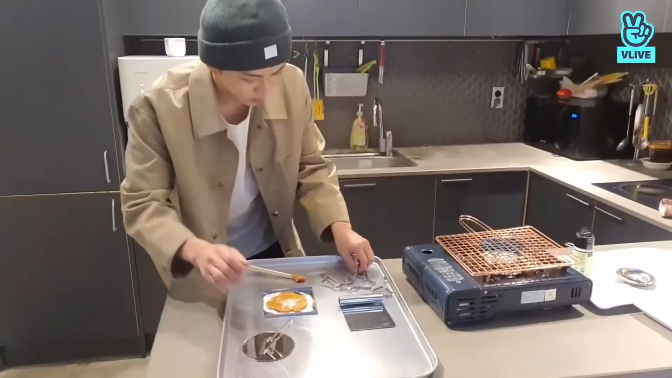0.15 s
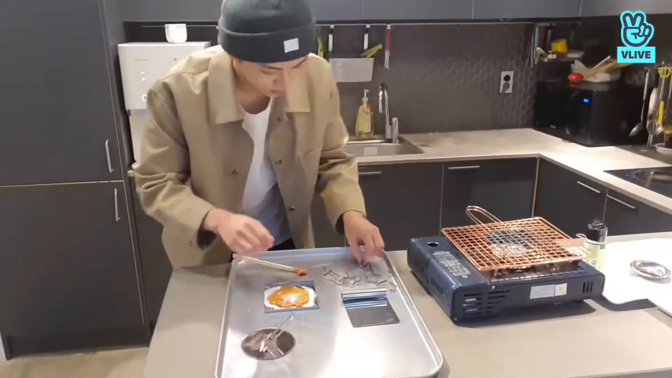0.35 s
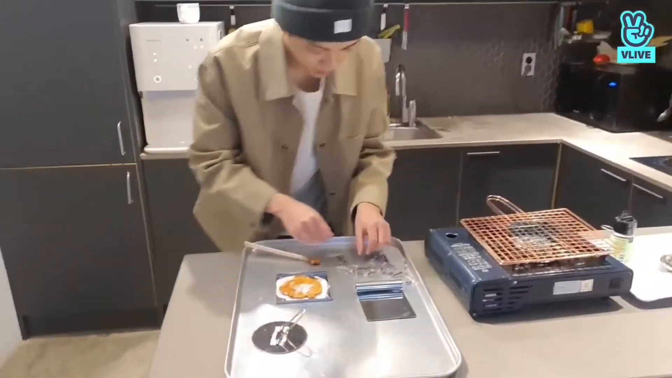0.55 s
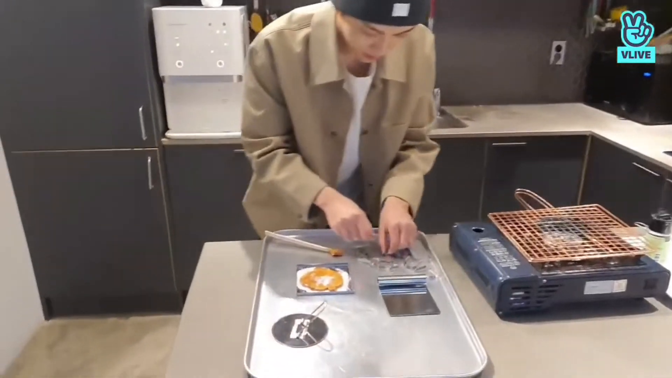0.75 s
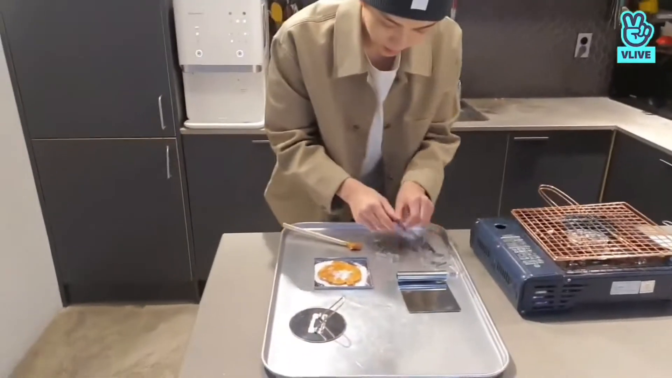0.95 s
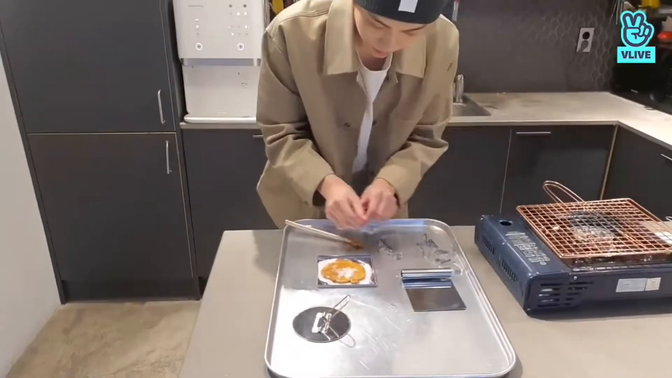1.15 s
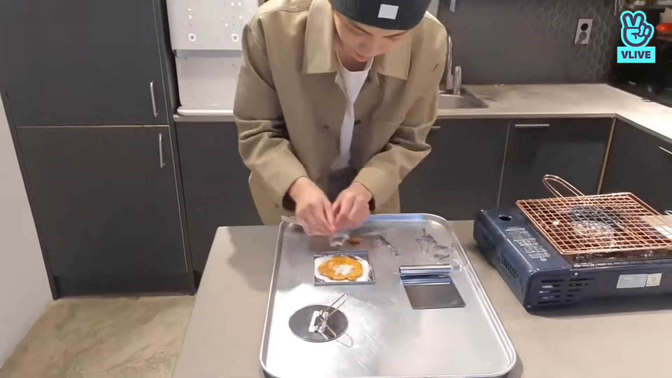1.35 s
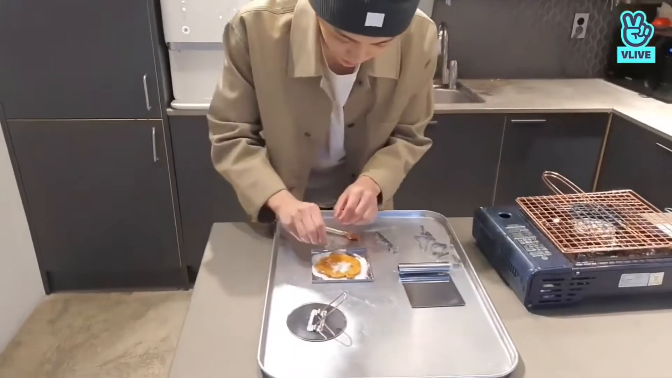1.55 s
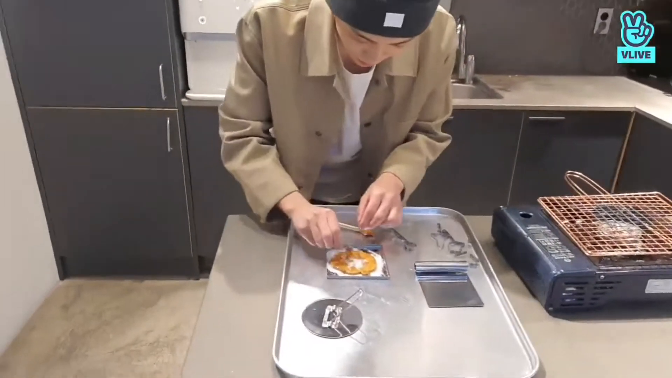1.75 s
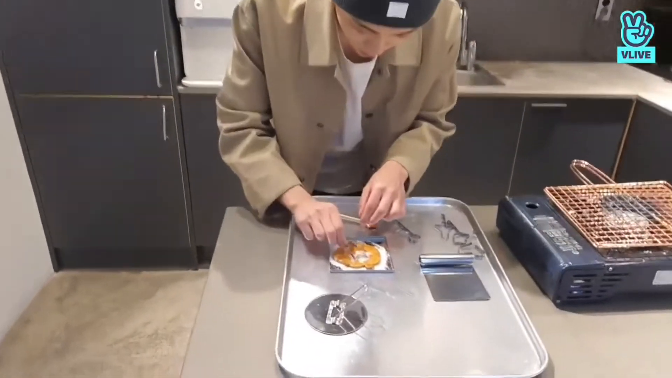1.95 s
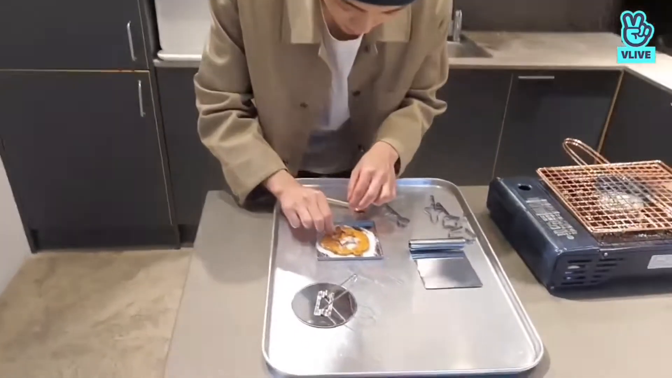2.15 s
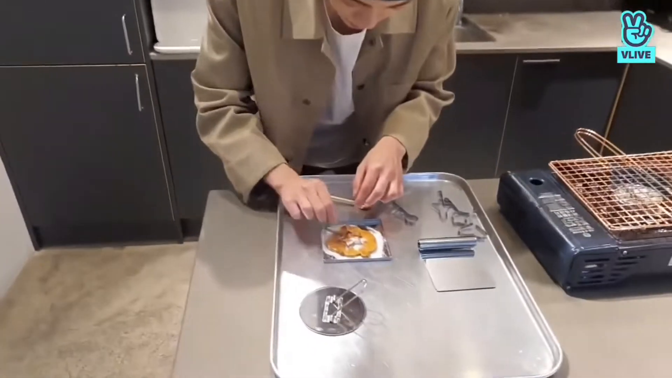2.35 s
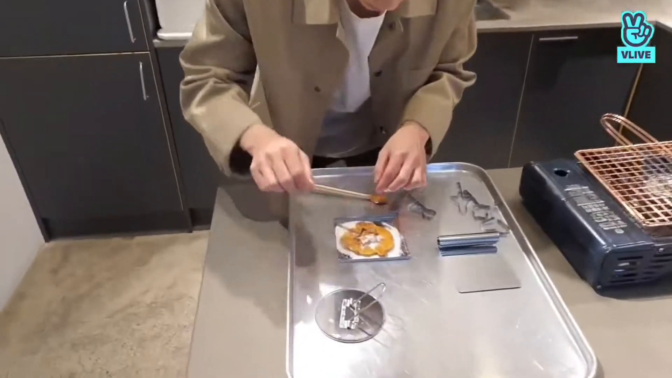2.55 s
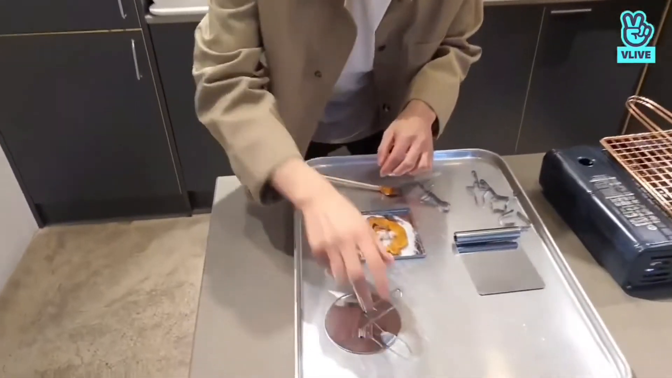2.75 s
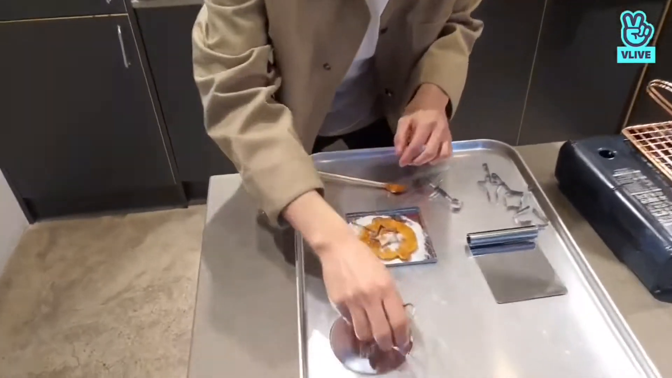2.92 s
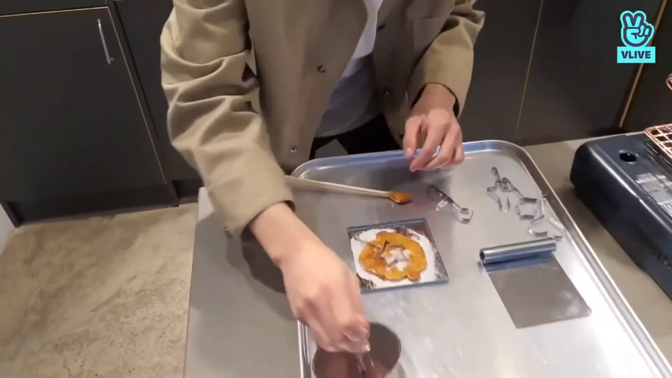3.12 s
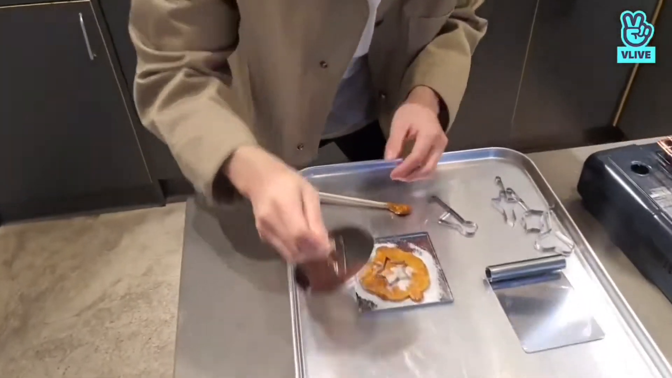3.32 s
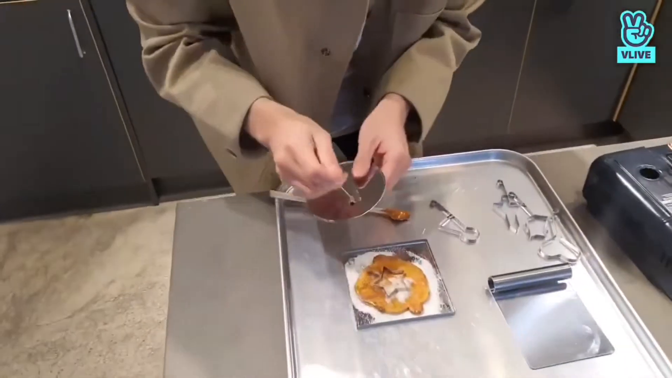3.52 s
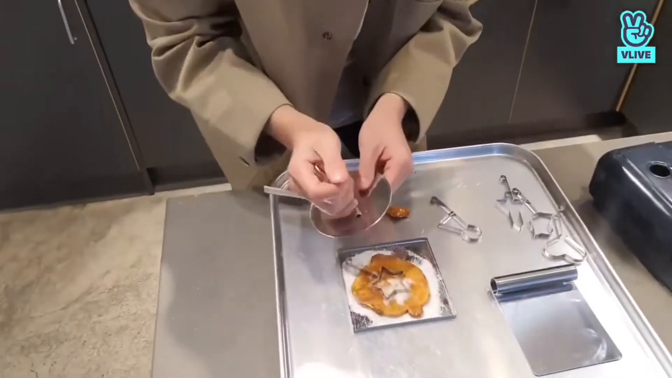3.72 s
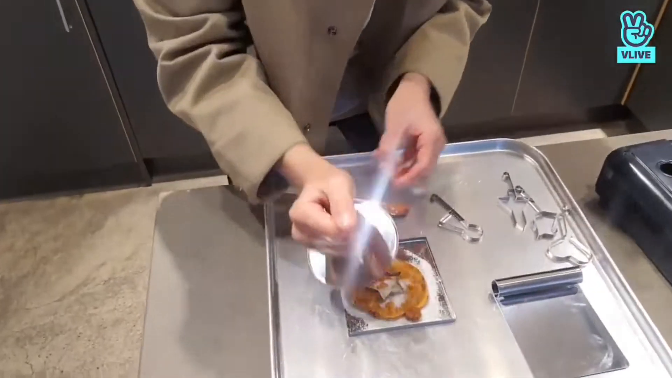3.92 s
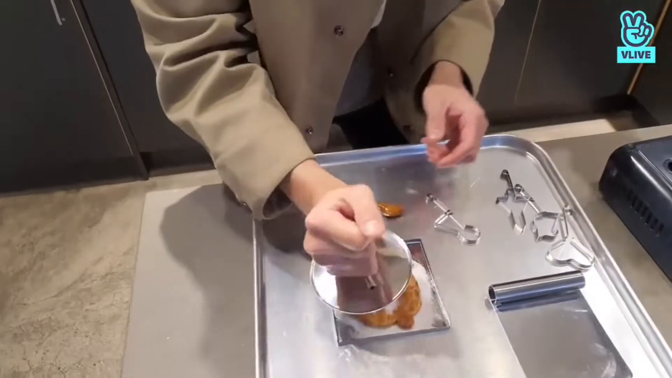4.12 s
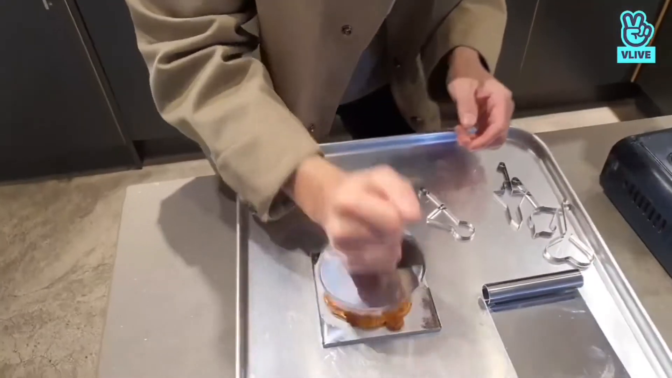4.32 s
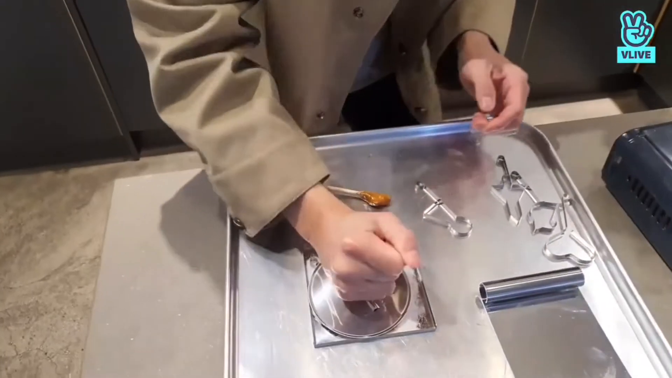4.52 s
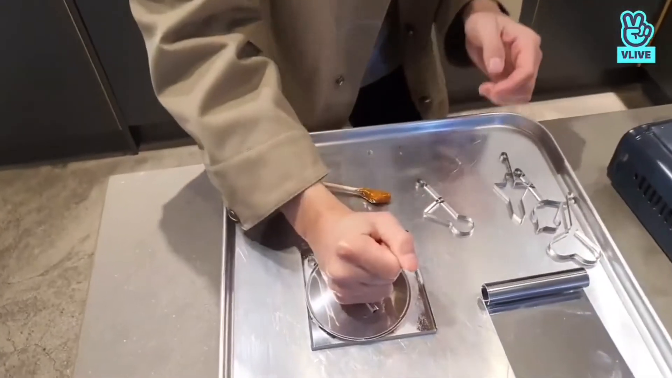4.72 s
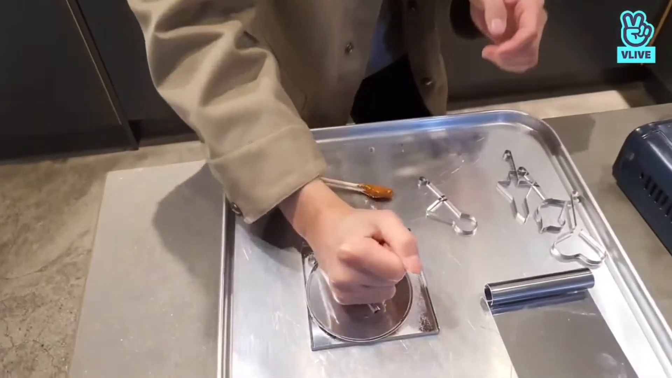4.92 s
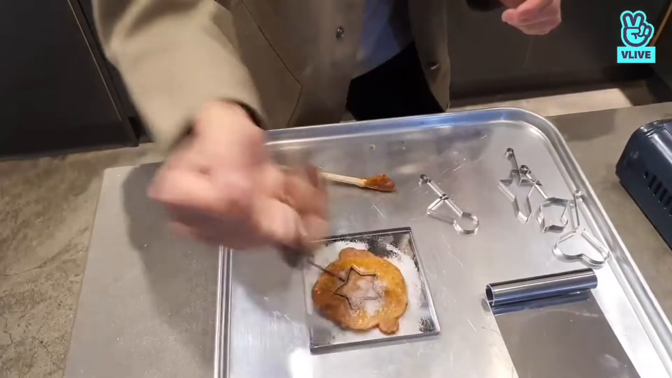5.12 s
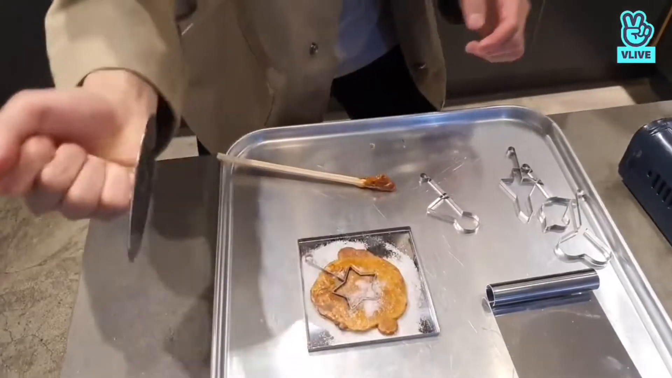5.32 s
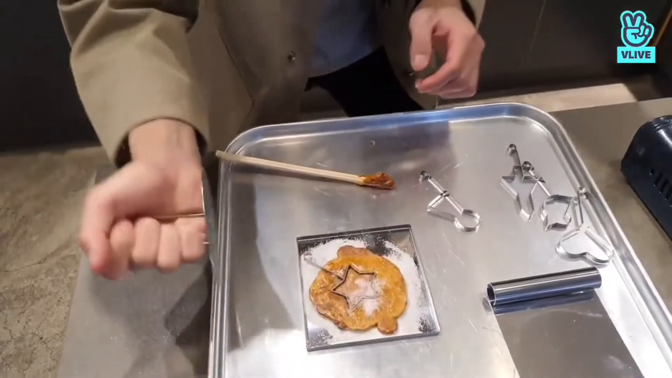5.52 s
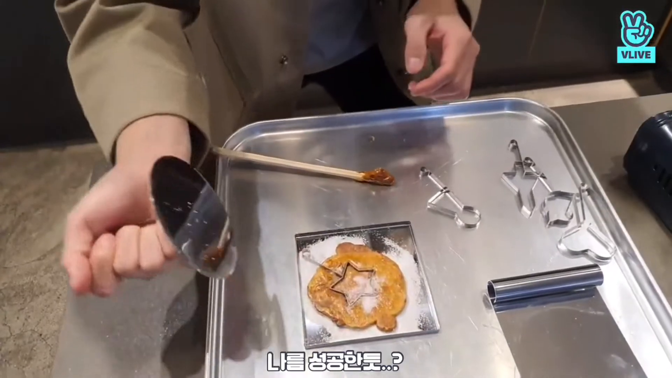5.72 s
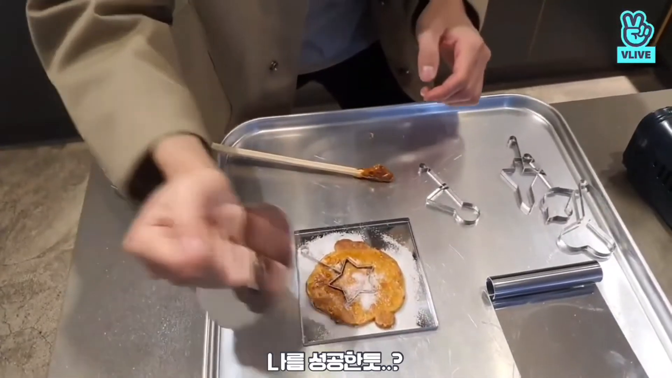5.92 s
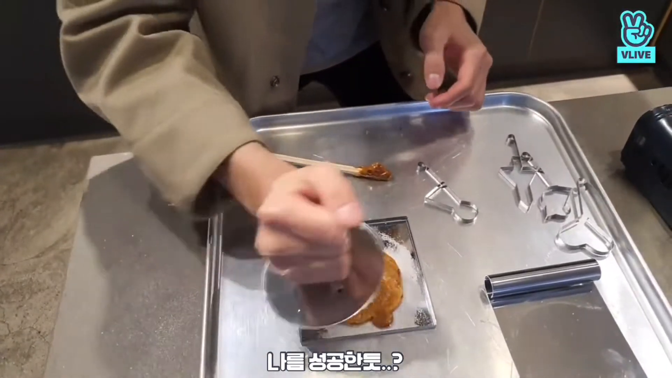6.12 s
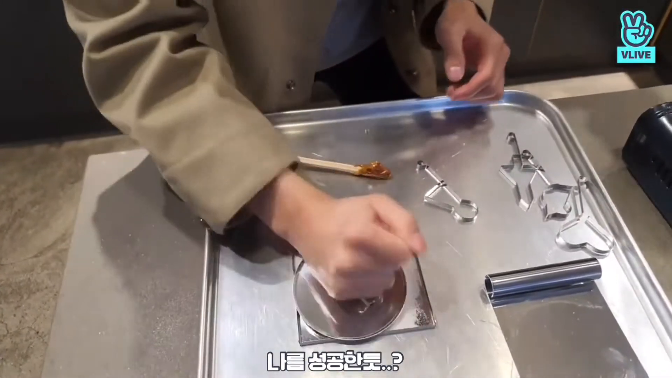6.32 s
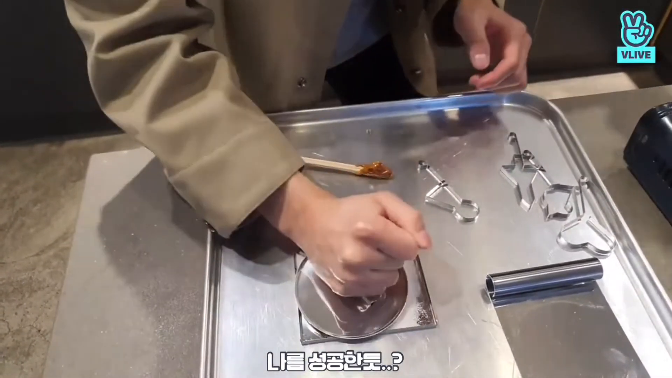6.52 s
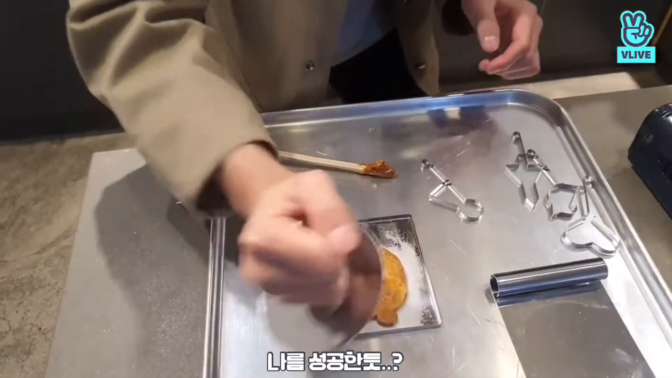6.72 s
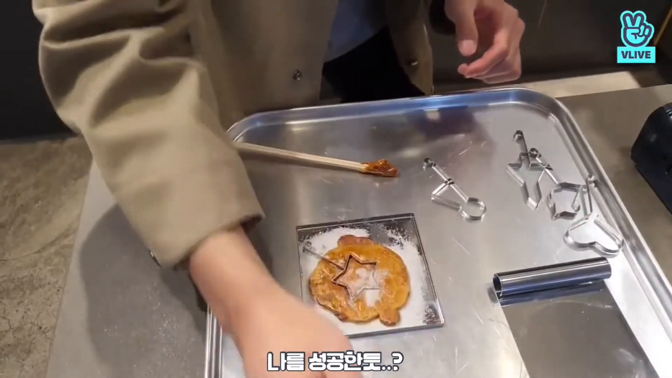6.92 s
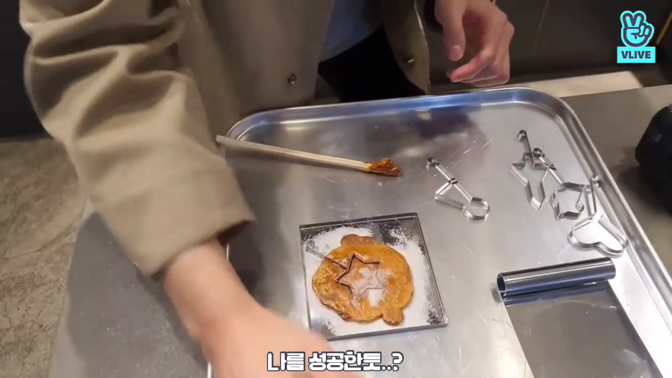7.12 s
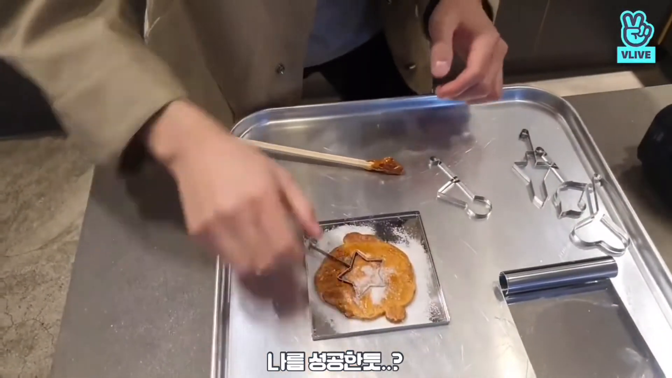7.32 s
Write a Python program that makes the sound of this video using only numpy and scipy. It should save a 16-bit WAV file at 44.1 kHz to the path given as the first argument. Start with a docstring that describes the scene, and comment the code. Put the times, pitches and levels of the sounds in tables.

```python
"""A steel press disc knocks, clinks and lifts on a sheet-steel tray as hands work in a hard-walled kitchen.
Each touch is a noise crack, tuned disc modes, a low tray boom and a dense shimmer dying band by band.
Thin cutters tinkle as high noise ticks with short modes; sleeves rustle as noise whose level and colour move.
Below lie a low appliance hum of banded noise, its level changing over time, and two faint narrow-noise whines."""
import sys
import numpy as np
from scipy import signal
from scipy.fft import rfft, irfft
from scipy.io import wavfile
from scipy.ndimage import uniform_filter1d

SR = 44100
rng = np.random.default_rng(int(sys.argv[2]) if len(sys.argv) > 2 else 0)


def generate_wav(sig):
    """Save sig (samples, or channels by samples) to the path in sys.argv[1] as 16-bit PCM at SR."""
    pcm = np.round(np.clip(np.atleast_2d(sig).T, -1, 1) * 32767).astype(np.int16)
    wavfile.write(sys.argv[1], SR, pcm)


N = 329338

CONTACT_RISE_S = 0.0015   # metal meets metal over a moment
FAVOUR_DB = 16   # favoured disc modes stand this far above the others
SHEEN_DB = -0.5   # trim of crack, shimmer and contact above 8 kHz


def from_db(db):
    """Turn a level in dB into a gain."""
    return 10 ** (np.asarray(db) / 20)


def rms_one(x):
    """Scale a signal to rms 1."""
    return x / np.sqrt(np.mean(x ** 2) + 1e-20)


def in_time(rows):
    """Read the columns of a time curve at every sample."""
    time_s, *columns = np.transpose(rows)
    return [np.interp(np.arange(N) / SR, time_s, column) for column in columns]


def at_hz(points, hz):
    """Read a spectrum on a log frequency axis."""
    points = np.array(points)
    return np.interp(np.log(hz), np.log(points[:, 0]), points[:, 1])


def drift(rate_hz):
    """Slow chance of rms 1: noise through two equal low-pass poles, drawn every 40 samples."""
    pole = np.exp(-2 * np.pi * rate_hz * 40 / SR)
    noise = rng.standard_normal(N // 40 + 2002)
    slow = signal.lfilter([1], [1, -2 * pole, pole * pole], noise)[2000:]   # skip the filter's start
    return np.interp(np.arange(N) / 40, np.arange(len(slow)), rms_one(slow))


def clicks(times_s, gains):
    """A train of single samples on a tiny offset."""
    train = np.full(N, 1e-18)
    np.add.at(train, (np.asarray(times_s) * SR).astype(int), gains)
    return train


def ring(train, hz, t60_s):
    """A two-pole resonator: a unit click sets a dying sine of height 1 ringing."""
    radius = from_db(-60 / (t60_s * SR))
    angle = 2 * np.pi * hz / SR
    return signal.lfilter([0, np.sin(angle)], [1, -2 * radius * np.cos(angle), radius * radius], train)


def fade(train, t60_s):
    """Each click becomes an exponentially dying envelope."""
    return signal.lfilter([1], [1, -from_db(-60 / (t60_s * SR))], train)


def bandpass(x, low_hz, high_hz):
    """Keep one band of a signal."""
    return signal.sosfilt(signal.butter(2, [low_hz, high_hz], "band", fs=SR, output="sos"), x)


def noise_bank(envelope_at, modal_db=0):
    """Noise in bands with their own envelopes; modal_db makes narrow lines, as a sheet's crowded modes."""
    mode_spacing_hz = 25
    edges_hz = 22 * 2 ** np.arange(0, 9.7, .3)
    spectrum = rfft(rng.standard_normal((2, N)))
    knots = rng.standard_normal(int(SR / 2 / mode_spacing_hz))
    lines = np.interp(np.linspace(0, len(knots) - 1, spectrum.shape[1]), np.arange(len(knots)), knots)
    white = rms_one(irfft(spectrum * from_db(modal_db * lines), N))
    out = np.zeros(N)
    for k, (low, high) in enumerate(zip(edges_hz, edges_hz[1:])):
        # neighbouring bands use unrelated noise
        out += bandpass(white[k % 2] * envelope_at(np.sqrt(low * high)), low, high)
    return out


def struck(times_s, level_db, modes, favour_db):
    """Every blow strikes each mode with a strength of its own, a moment sooner or later."""
    shape = (len(times_s), len(modes))
    spread_db = rng.normal(0, 2.0, shape)
    late_s = rng.random(shape) * 2 * CONTACT_RISE_S
    out = np.zeros(N)
    for k, (hz, mode_db, t60_s) in enumerate(modes):
        gains = from_db(level_db + mode_db + favour_db(hz) + spread_db[:, k])
        out += ring(clicks(times_s + late_s[:, k], gains), hz, t60_s)
    return out


def disc_touches():
    """Gather heavy landings, light touches and lifts; their grip and point struck differ."""
    # disc landing on tray or plate with its weight; levels are relative:
    # start_s, level_db, brightness_db_per_octave, low_weight_db, tray_boom_db, tray_shimmer_db,
    # favoured low_mode_hz, middle_mode_hz, high_mode_hz
    landings = [(0.445, -49, -3.5, 14.5, 9.5, 3, 1210, 3800, 4820),
                (0.505, -32.5, -2.6, 16.5, -8, 0, 1200, 3960, 4730),
                (2.909, -11, -3.5, -1.5, -28.5, -9.5, 1370, 3380, 6530),
                (2.958, -22, -1.1, 0, -21.5, -3, 1310, 4230, 4600),
                (4.408, 0.5, 0.56, 8, -31.5, -8, 1504, 3340, 7770),
                (6.354, -2, 1.3, 14.5, -17, -6.5, 1360, 3610, 4890),
                (6.513, -25.5, -6.5, -9, -13.5, -4, 1280, 3800, 5100),
                (6.627, -19, -0.7, 7.5, -40, -12.5, 1340, 2280, 7200),
                (7.011, 2, 0.1, -18.5, -37, -11.5, 1690, 4000, 6600),
                (7.023, 0, -4, -21.5, -33.5, -41, 2270, 3940, 7180),
                (7.035, 0, -1, 3, -32.5, -16, 1500, 3030, 6500),
                (7.138, -23, -0.8, 8, -17, -2.5, 1440, 3400, 4600),
                (7.315, -38.5, -2.5, 22, -10.5, -13, 1720, 3740, 4410)]
    # light touches of the disc's edge and wire handle:
    # start_s, level_db, brightness_db_per_octave, tray_shimmer_db,
    # favoured low_mode_hz, middle_mode_hz, high_mode_hz
    light_touches = [(0.259, -39, 0, 7, 1950, 3670, 5850), (0.819, -22.5, 0.1, -4, 2060, 3950, 5960),
                     (1.655, -49, 0, 1, 1350, 4170, 7000), (3.042, -25.5, 5, -23, 1620, 2490, 4430),
                     (3.08, -33, 4, -21, 1600, 2450, 5350), (3.108, -23, 8.5, -15, 1900, 2270, 5270),
                     (3.201, -23.5, -2, -13, 1740, 3156, 5800), (3.235, -27, -3.5, -8, 1730, 3260, 5260),
                     (3.43, -43.5, -9, -10, 1880, 3110, 5800), (3.56, -32.5, 6, -10.5, 1600, 4480, 7060),
                     (3.62, -18.5, 5.5, -8, 1630, 3120, 5040), (3.656, -20.5, -2, -8, 1660, 2750, 5100),
                     (3.739, -38, 1, -3, 1670, 2840, 4820), (3.818, -16, -0.2, -11, 1750, 3480, 7100),
                     (3.858, -25.5, -7.5, -13, 1490, 3320, 4740), (3.919, -38, 1, -1, 1540, 3200, 5800),
                     (3.996, -27.5, -7, -18, 1510, 2790, 6440), (4.071, -36, -1, -16, 1420, 2200, 5870),
                     (4.138, -36, -6.5, -11, 1570, 2280, 4800), (4.229, -38.5, 3.5, -13, 1280, 4460, 5900),
                     (4.744, -36.5, 0, -3, 1680, 2240, 7000), (4.793, -32.5, 5, -17, 1580, 3040, 4700),
                     (4.842, -33.5, -0.5, -2, 2110, 3070, 4120), (4.929, -37.5, -1, 3, 1760, 3020, 5720),
                     (4.967, -38, -5, 0, 1370, 4140, 4370), (5.13, -40, -6, -2, 1780, 3400, 5500),
                     (5.193, -37.5, -8.5, -5.5, 1684, 3900, 4330), (5.992, -53, -1, 6.5, 1745, 3270, 4650),
                     (6.349, -16, -4.5, 7, 1305, 4290, 4700), (6.737, -38.5, -5, -22, 1660, 2200, 6700),
                     (6.854, -37, 1, -4, 1530, 2670, 7650), (6.961, -35, 3.5, -6, 2010, 2830, 7400),
                     (7.108, -17.5, 2.5, -2.5, 1610, 3380, 6850), (7.242, -26.5, 2, -29, 1610, 4050, 7100),
                     (7.256, -27, -1.5, -23, 1400, 3400, 4700)]
    # the disc comes free of a surface and rings on: columns as the light touches
    lifts = [(3.614, -16.5, 0.5, -0.5, 1830, 4670, 5130), (4.869, -23, 5, -15.5, 3320, 3850, 7840),
             (5.008, -17.5, -4.5, -15, 1700, 2240, 5570), (6.881, -18.5, -0.5, -8, 1815, 3200, 4630)]
    knock_ring_db, clink_ring_db, lift_ring_db = -18.5, -14, -15.5   # disc ring against the touch level
    knock_shimmer_s, clink_shimmer_s = 0.51, 0.42   # base t60, scaled in each band
    light_weight_db, light_boom_db = -15.5, -44   # a light touch has little bass
    rows = [(*row, knock_ring_db, knock_shimmer_s) for row in landings]
    for table, ring_db in [(light_touches, clink_ring_db), (lifts, lift_ring_db)]:
        for start_s, level_db, brightness, *rest in table:
            rows.append((start_s, level_db, brightness, light_weight_db, light_boom_db,
                         *rest, ring_db, clink_shimmer_s))
    names = ["start_s", "level_db", "brightness", "weight_db", "boom_db", "shimmer_db",
             "low_hz", "middle_hz", "high_hz", "ring_db", "shimmer_s"]
    touches = dict(zip(names, np.transpose(rows)))
    touches["top_hz"] = np.full(len(rows), 12250)   # a top mode common to all
    touches["free"] = np.arange(len(rows)) >= len(rows) - len(lifts)
    return touches


def near(touches, hz, octaves):
    """The point struck and the grip favour four groups of modes: 1 there, 0 far away."""
    favoured = [touches[name] for name in ("low_hz", "middle_hz", "high_hz", "top_hz")]
    return np.max([np.exp(-(np.log2(hz / best) / octaves) ** 2) for best in favoured], axis=0)


def disc_ring(touches):
    """The disc's modes ring on when free, shorter when held, and loud but brief during contact."""
    # modes of the steel disc: pitch_hz, level_db, t60_s when free
    disc_modes = [(1289, -5, 0.037), (1468, -2.5, 0.075), (1646, -6, 0.1), (1740, -1.5, 0.27),
                  (1823, -3, .1), (2282, -1, 0.084), (2535, 2, 0.08), (2770, -7.5, .15), (2880, -1.5, .07),
                  (3059.5, -1, 0.68), (3190, -9, 0.38), (3382, -5, 0.14), (3772, -1, .12), (4110, 4, 0.26),
                  (4280, -0.5, 0.16), (4590, -4, 0.12), (4800, -2, 0.19), (5050, 2.5, 0.099),
                  (5490, -0.5, .17), (6120, -9, .07), (7000, 0.5, 0.075), (6990, -2.5, 0.074),
                  (7350, -4.5, 0.11), (7660, 2, 0.1), (7440, -7.5, 0.38), (8000, 0, .05),
                  (11300, -9.5, 0.074), (11200, 4, 0.16), (12100, -13.5, 0.11), (13500, -0.5, .07)]
    held_t60_s = 0.16   # longest ring while the disc is gripped or lies on something
    contact_db, contact_t60_s = 9, 0.035
    favour_octaves = 0.05
    held_modes = [(hz, db, min(t60_s, held_t60_s)) for hz, db, t60_s in disc_modes]
    damped_modes = [(hz, db, contact_t60_s) for hz, db, _ in disc_modes]
    start_s, free = touches["start_s"], touches["free"]
    ring_level_db = touches["level_db"] + touches["ring_db"] - FAVOUR_DB
    out = np.zeros(N)
    for rows, modes in [(free, disc_modes), (~free, held_modes)]:
        out += struck(start_s[rows], ring_level_db[rows], modes,
                      lambda hz: FAVOUR_DB * near(touches, hz, favour_octaves)[rows])
    # while the parts still touch, the same modes sound louder and die at once
    out += struck(start_s, ring_level_db + contact_db, damped_modes,
                  lambda hz: FAVOUR_DB * near(touches, hz, 2 * favour_octaves) + SHEEN_DB * (hz > 8000))
    return out


def room(x):
    """Dense reflections off hard walls: a dying noise response, duller than the direct sound."""
    room_db, room_t60_s, build_up_s = -9, 0.3, 0.0062
    age_s = np.arange(0, 0.5, 1 / SR)
    echo = rng.standard_normal(len(age_s)) * from_db(-60 * age_s / room_t60_s)
    echo = signal.lfilter([1], [1, -.6], echo * np.minimum(age_s / build_up_s, 1))
    echo /= np.sqrt(np.sum(echo ** 2))
    return x + from_db(room_db) * signal.fftconvolve(x, echo)[:N]


def crack_and_shimmer(touches):
    """Contact cracks as brief noise; the sheet's crowded modes and the room die band by band."""
    # dense upper tray modes and room: pitch_hz, relative level_db
    shimmer_spectrum = [(150, -34.5), (250, -7.5), (319, -20.5), (444, -9.5), (651, -12.5), (1180, -4.5),
                        (2360, -7), (3400, -6.5), (5830, -8.5), (7310, -3.5), (8850, -15), (12300, -5.5),
                        (16000, -15)]
    # decay of the shimmer over frequency: pitch_hz, share of the base t60
    shimmer_length = [(250, 1.2), (1000, 1.047), (4000, 1.324), (9000, .8), (15000, .7)]
    snap_t60_s, crack_db, crack_t60_s = 0.0075, -9, 0.045
    uneven_db = 1.5   # chance spread of each touch in each band
    step = 16   # samples per step of the shimmer envelope
    rise = max(int(CONTACT_RISE_S * SR), 1)
    age_s = np.arange(0, 0.7, step / SR)
    starts = (touches["start_s"] * SR / step).astype(int)
    flutter = from_db(2.5 * drift(65))   # random fast flutter of the shimmer level

    def envelope(hz):
        """Crack and shimmer of all touches in one band."""
        colour_db = touches["brightness"] * np.log2(hz / 4000)
        colour_db += touches["weight_db"] * np.clip(np.log2(1200 / hz), 0, 1)
        colour_db += 2.4 * near(touches, hz, 0.37) + SHEEN_DB * (hz > 8000)
        thin_db = -18 * max(np.log2(110 / hz), 0)   # a small sheet radiates no deep bass
        chance_db = rng.normal(0, uneven_db, len(starts))
        level = from_db(touches["level_db"] + at_hz(shimmer_spectrum, hz) + colour_db + thin_db + chance_db)
        power = np.zeros(N // step + len(age_s) + 1)
        tail_gains = level * from_db(touches["shimmer_db"])
        for start, gain, base_s in zip(starts, tail_gains, touches["shimmer_s"]):
            decay = from_db(-60 * age_s / (base_s * at_hz(shimmer_length, hz)))
            build_up = 1 - np.exp(-age_s / 0.0056)   # reflections build up
            power[start:start + len(age_s)] += gain ** 2 * decay ** 2 * build_up
        train = clicks(touches["start_s"], level)
        crack = fade(train, snap_t60_s) + from_db(crack_db) * fade(train, crack_t60_s)
        crack = uniform_filter1d(np.roll(crack, rise // 2), rise)   # soften the onset
        return crack + flutter * np.sqrt(np.repeat(power, step)[:N])

    return noise_bank(envelope, modal_db=4.5)


def tray_boom(touches):
    """The lowest modes of the tray swing a little after each touch."""
    # lowest tray modes: pitch_hz, level_db, t60_s
    tray_modes = [(134.9, -16.5, 0.57), (172.2, 3.5, 0.37), (182.8, -5, 0.58), (451.5, -16.5, 0.21),
                  (536, -6.5, 0.24)]
    boom = np.zeros(N)
    for hz, mode_db, t60_s in tray_modes:
        gains = from_db(touches["level_db"] + touches["boom_db"] + mode_db)
        boom += ring(clicks(touches["start_s"] + 0.0072, gains), hz, t60_s)
    # the sheet takes a few cycles to swing: low-pass, then make-up gain
    return signal.lfilter([.02], [1, -.98], boom) * from_db(5.5)


def counter_thud():
    """The hand's weight shakes the counter: low noise under dying envelopes."""
    # presses of the hand: start_s, level_db
    hand_presses = [(4.41, -3), (6.355, -28.5)]
    start_s, level_db = np.transpose(hand_presses)
    shake = fade(clicks(start_s, from_db(level_db)), t60_s=0.16) * rng.standard_normal(N)
    return bandpass(shake, 30, 179)


def cutter_tinkles():
    """Thin strips tick high and short, with a small wash behind."""
    # thin cutters touching: start_s, level_db
    cutter_touches = [(0.2064, -52), (0.2708, -35), (0.6579, -7), (0.672, -15.5), (0.8197, -5.5),
                      (0.8854, -12.5), (0.9073, -13.5), (1.0394, -28), (1.1054, -60), (1.1777, -37),
                      (1.216, -35), (1.2506, -36), (1.3259, -42)]
    # modes of a thin cutter: pitch_hz, level_db, t60_s before damping
    cutter_modes = [(9065, -91, 0.19), (9750, -20, 0.11), (11010, -10.5, 0.22), (10710, 4.5, 0.077),
                    (12270, -25, 5.0), (13300, -2.5, 0.053)]
    start_s, level_db = np.transpose(cutter_touches)
    train = clicks(start_s, from_db(level_db))
    envelope = fade(train, 0.0052) + from_db(-16) * fade(train, 0.36)   # tick and wash
    high = bandpass(rng.standard_normal(N) * envelope, 9000, 15000)
    middle = bandpass(rng.standard_normal(N) * envelope, 2000, 9000)
    damped_modes = [(hz, db, min(t60_s, .05)) for hz, db, t60_s in cutter_modes]
    return high + from_db(-7) * middle + struck(start_s, level_db - 16, damped_modes, lambda hz: 0)


def sleeve_rustle():
    """Cloth rustles in soft grains: noise bands flicker together and apart."""
    # spectrum of moving cloth: pitch_hz, relative level_db
    cloth_spectrum = [(71, -15.5), (120, 2), (236, -6), (289, -7), (418, 1.5), (605, -3), (1620, -5.5),
                      (2590, -11), (3980, -7), (7500, -6.5), (9210, -28.5), (11100, -3.5), (16000, -26.5)]
    # sleeves and hands moving: time_s, level_db, brightness_db_per_octave
    movement = [(0.0, -34.5, 0.3), (0.29, -44, -3.5), (0.56, -27.5, 0), (0.68, -23, 1), (0.81, -24.5, 0.7),
                (0.91, -18, 1.5), (1.12, -31, 1.7), (1.35, -46.5, -2.1), (1.79, -52, 1), (2.0, -60.5, -3),
                (2.3, -57, -4), (2.4, -51, -4), (2.93, -40, -3), (3.55, -48.5, -1), (3.8, -35, 0),
                (4.25, -48, -2.5), (4.8, -44, -1.5), (5.3, -63.5, -6), (6.3, -58.5, 2), (6.7, -56, -5),
                (7.47, -57, 0)]
    level_db, brightness = in_time(movement)
    together_db = drift(25)

    def envelope(hz):
        """Colour and grain of one band."""
        colour_db = at_hz(cloth_spectrum, hz) + brightness * np.log2(hz / 3000)
        return from_db(colour_db + together_db + 2.3 * drift(3.7))

    return from_db(level_db) * noise_bank(envelope)


def appliance_hum():
    """A low hum of drifting noise bands with the motor's own wavering note."""
    # spectrum of the hum before the cuts at both ends: pitch_hz, relative level_db
    hum_spectrum = [(21, -31), (36, -16), (63, 2), (96, -11), (124, -7), (156, -21), (184, -16), (286, -25),
                    (390, -21.5), (900, -35.5), (1170, -49), (1980, -120)]
    # background hum level over time: time_s, level_db
    hum_level = [(0.0, -38), (0.25, -56.5), (0.7, -38.5), (1.1, -45.5), (1.8, -47.5), (2.5, -48.5),
                 (2.9, -63.5), (3.2, -64), (3.6, -49.5), (3.76, -47.5), (4.3, -47.5), (5.15, -49),
                 (5.35, -62), (5.7, -54.5), (6.2, -51), (6.7, -55.5), (7.05, -56), (7.47, -55)]

    def envelope(hz):
        """Level of one band, cut at both ends of the spectrum."""
        cut_db = -30 * (hz > 900) - 9 * (hz < 36)
        return from_db(at_hz(hum_spectrum, hz) + cut_db + 2 * drift(14))

    motor_note = rms_one(ring(rng.standard_normal(N), 59, 0.71))
    (level_db,) = in_time(hum_level)
    return from_db(level_db) * (rms_one(noise_bank(envelope)) + from_db(-8.5) * motor_note)


def faint_whines():
    """Two whines come and go: noise through narrow resonators."""
    # whines: pitch_hz, width_hz
    whine_pitches = [(4560, 48), (11720, 140)]
    # course of the whines: time_s, lower_whine_level_db, upper_whine_level_db
    whine_levels = [(0, -94.5, -90), (1.1, -81, -82), (1.25, -64.5, -75), (1.75, -70, -79.5),
                    (2.1, -72, -77), (2.3, -78, -77), (2.9, -91.5, -78.5), (5.3, -70.5, -99),
                    (5.7, -83.5, -99), (6.0, -86, -99), (7.47, -86, -99)]
    out = np.zeros(N)
    for (hz, width_hz), level_db in zip(whine_pitches, in_time(whine_levels)):
        narrow = ring(rng.standard_normal(N), hz, np.log(1000) / (np.pi * width_hz))
        out += from_db(level_db + 4.9 * drift(4.3)) * rms_one(narrow)
    return out


def scene():
    """All sources at one microphone; only the disc's ring passes through the room echo."""
    touches = disc_touches()
    disc = room(disc_ring(touches)) + crack_and_shimmer(touches)
    tray = tray_boom(touches) + counter_thud()
    background = sleeve_rustle() + appliance_hum() + faint_whines()
    return (disc + tray + cutter_tinkles() + background)[None]


def record(dry):
    """Peaks are rounded; treble is much weaker above about 16 kHz and ends near 17 kHz."""
    upper_treble_db = -24
    rounded = 1.012 * np.tanh(dry / 1.924)   # also sets quiet sounds to about half
    body = signal.sosfilt(signal.cheby2(14, 50, 16000, fs=SR, output="sos"), rounded)
    heard = body + from_db(upper_treble_db) * rounded
    return signal.sosfilt(signal.cheby2(18, 55, 16979, fs=SR, output="sos"), heard)


dry = scene()
out = record(dry)
generate_wav(out)
```